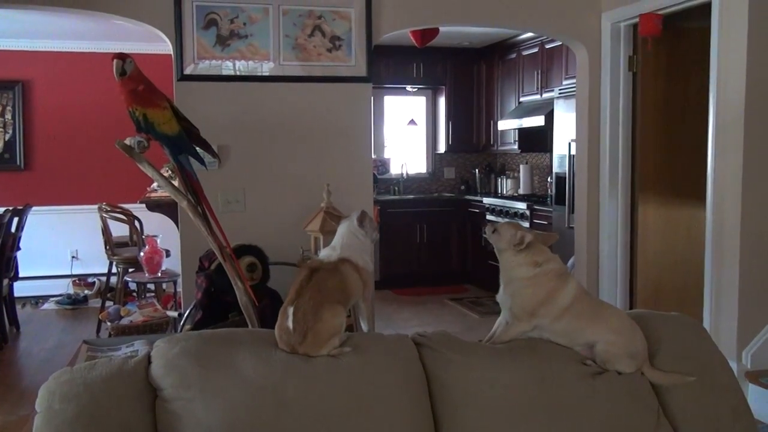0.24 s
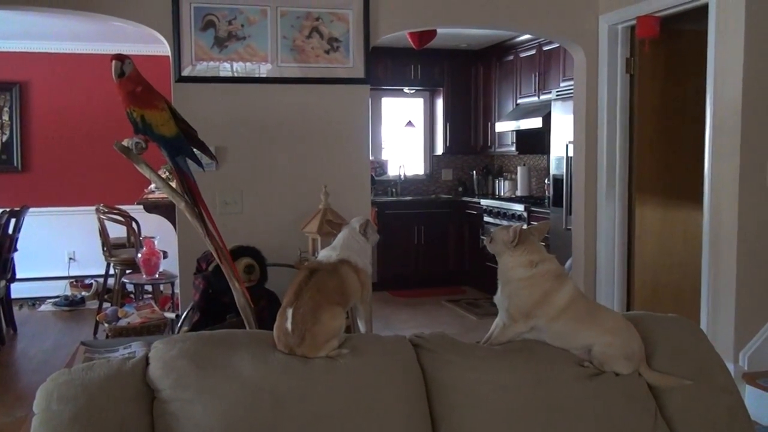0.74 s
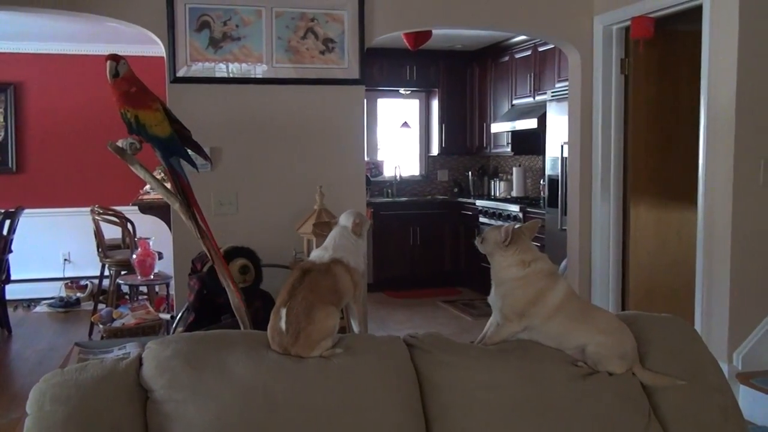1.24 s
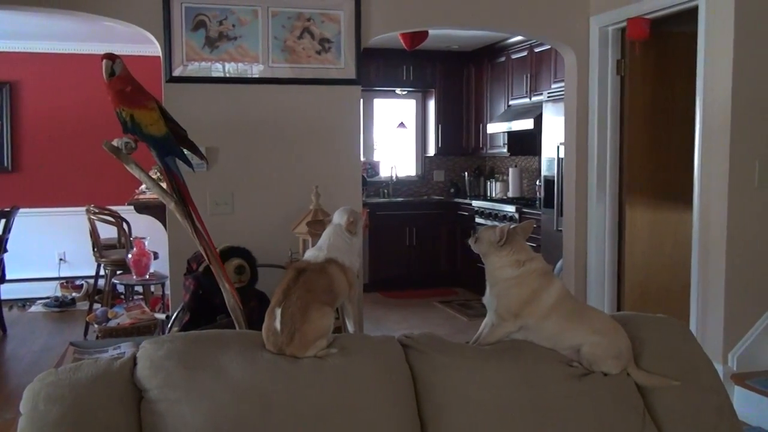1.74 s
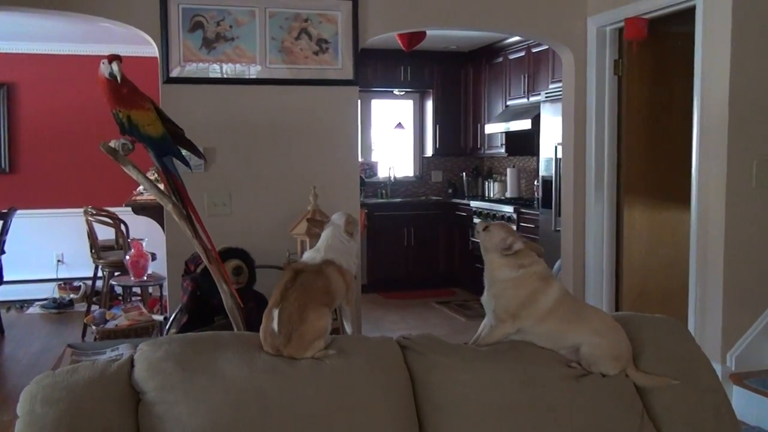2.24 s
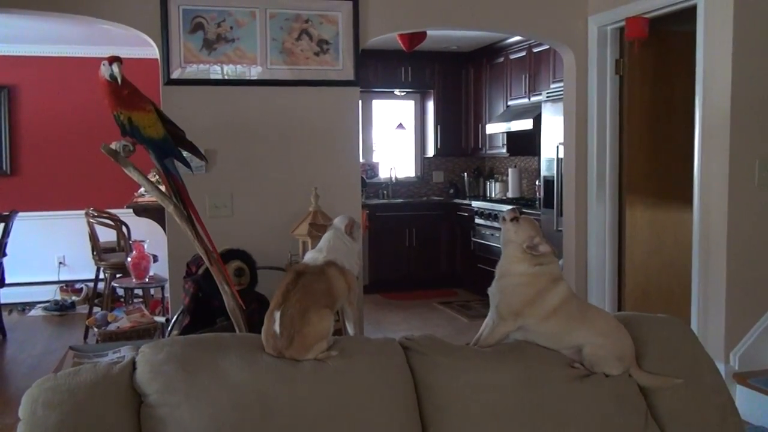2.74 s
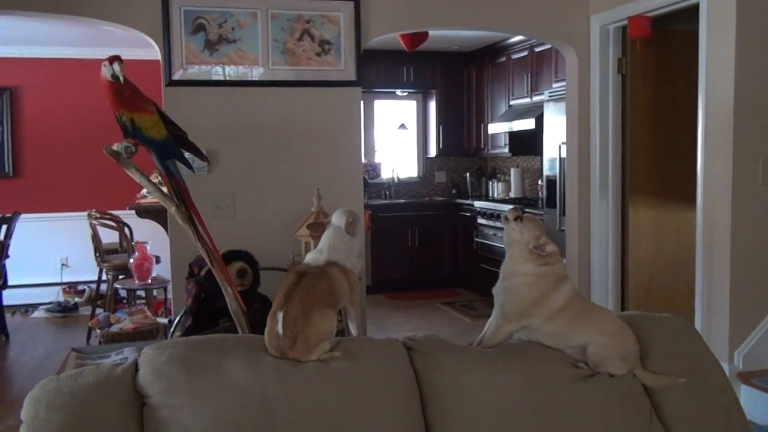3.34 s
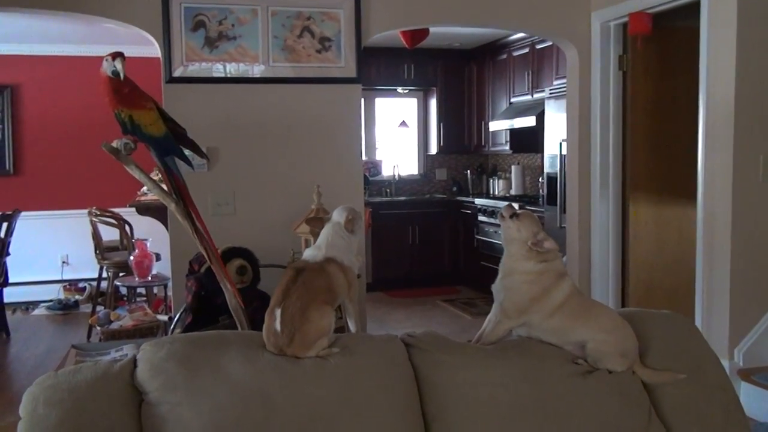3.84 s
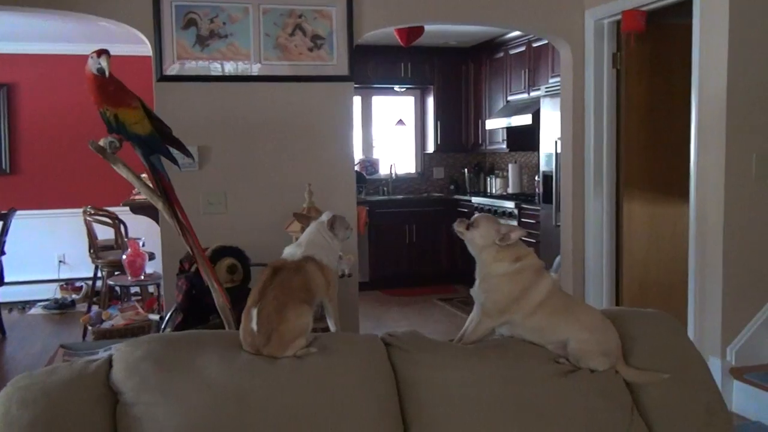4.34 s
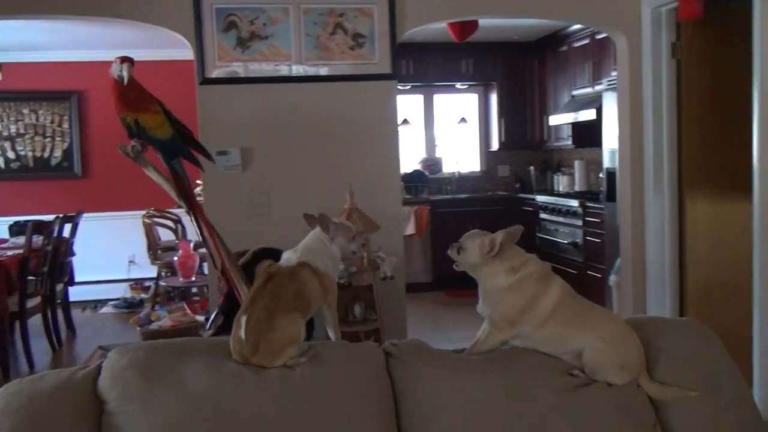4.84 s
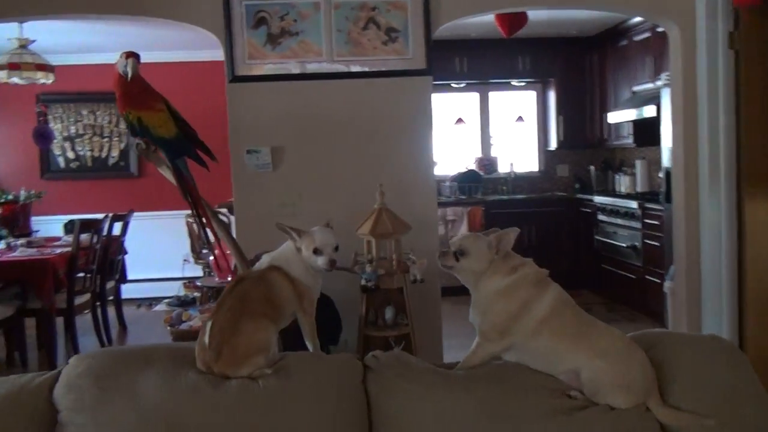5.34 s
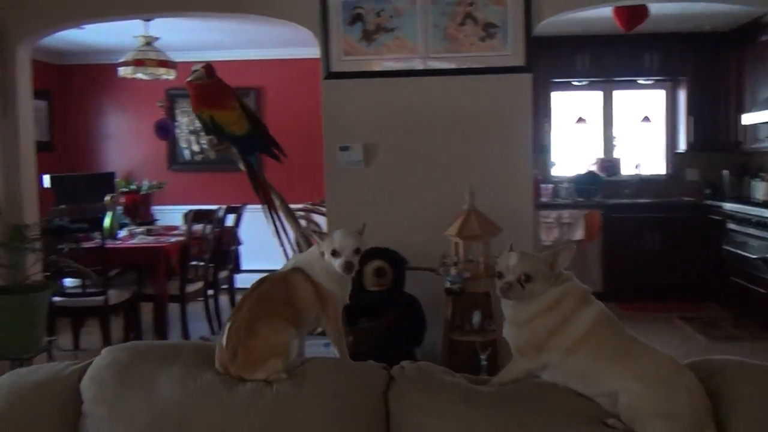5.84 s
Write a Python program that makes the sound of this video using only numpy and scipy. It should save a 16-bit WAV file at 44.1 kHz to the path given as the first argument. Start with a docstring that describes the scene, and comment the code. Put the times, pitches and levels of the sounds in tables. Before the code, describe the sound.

A small dog, slightly to the right in a living room, opens with a brief high whine over the rough tail of a bark. Very soft whimpers and thin whistles follow, growing a little just before 2 seconds. At about 2.1 seconds a sharp, raspy bark closes into a long, high howl. It swells unevenly, sinks in pitch and fades, with a brief whistling overtone near 3.2 seconds and a hoarse crack near 3.7. At 4.1 seconds a loud rising yelp ends it. Two short, sharp yips come at about 4.8 and 5.5 seconds, with quiet whimpers around them and a last faint one near 6 seconds. The room rings for about half a second after each call, and the loudest calls sound slightly held down. Quiet room tone lies underneath, with the faint whir and a few ticks of a hand-held camera in the last two seconds.

```python
"""A small dog whines over the rough fading tail of a bark, barks into a long falling howl, then gives a
yelp and two sharp yips. Soft whimpers and thin whistles come between the calls, and an overtone of the
howl flares briefly near 4 kHz. The voice is a source-filter system: vocal folds and puffs of breath
excite throat, mouth and nose. A live living room rings after each call. Behind lie room tone and the
faint whir and ticks of a hand-held camera, whose gain control holds the loudest calls down."""
import sys
import numpy as np
from scipy import signal
from scipy.fft import rfft, irfft
from scipy.io import wavfile
from scipy.ndimage import uniform_filter1d

SR = 44100
rng = np.random.default_rng(int(sys.argv[2]) if len(sys.argv) > 2 else 0)


def unload_audio(sound):
    """Save the sound as a 16-bit wav file, at the path given as the first command line argument."""
    columns = np.transpose(np.atleast_2d(sound))
    # keep every value between -1 and 1, then stretch to whole-number steps
    steps = np.round(np.clip(columns, -1, 1) * 32767)
    wavfile.write(sys.argv[1], SR, steps.astype(np.int16))


N = 268260

# Voice levels are those at the source. "Opening" is the treble lift that a wider mouth gives.
# course of the long howl: (time [s], pitch [Hz], level [dB], opening [dB/octave])
HOWL = [(2.19, 850, -47, -5), (2.24, 798, -22.5, 0), (2.33, 781, -24, -3.5), (2.42, 787, -37.5, 3),
        (2.53, 780, -32, 7), (2.61, 801, -18.5, -1), (2.68, 763, -30.5, 0), (2.76, 743, -41, 3),
        (2.81, 702, -29.5, -1), (2.865, 654, -42, 5), (3.02, 604, -37.5, 1), (3.15, 597, -38, .5),
        (3.23, 655, -36.5, 4.5), (3.315, 677, -30, 1.5), (3.4, 577, -38, 0), (3.46, 541, -33, -13),
        (3.6, 452, -48.5, -2), (3.73, 447, -46, 1), (3.86, 483, -55.5, 3), (3.96, 465, -56, 2),
        (4.07, 470, -46, 1)]
# clear cries, a whine and a yelp: (start [s], length [s], first pitch [Hz], top pitch [Hz],
# top after [s], last pitch [Hz], level [dB], attack [s], release [s], roughness [0-1],
# first opening [dB/octave], later opening [dB/octave])
CRIES = [(0, .26, 782, 796, .07, 695, -22.4, .002, .11, .02, 24, -4),
         (4.08, .19, 535, 788, .11, 740, -17, .05, .06, .09, -15, 8)]
# a bark and two yips: (start [s], length [s], first pitch [Hz], top pitch [Hz], top after [s],
# last pitch [Hz], level [dB], release [s], roughness [0-1], opening [dB/octave],
# closing [dB/octave], subharmonics [ratio], added fundamental [ratio])
BARKS = [(2.069, .21, 480, 1030, .066, 770, -17, .095, .5, 6.3, 45, 1.6, .03),
         (4.81, .175, 470, 1090, .08, 1010, -18.2, .04, .31, 5, 3, 5, .5),
         (5.496, .17, 495, 1035, .052, 885, -16, .06, .21, 7.5, 5, 2.7, .62)]
# first the rough fading tail of a bark under the start of the whine, then soft whimpers:
# (start [s], length [s], first pitch [Hz], last pitch [Hz], level [dB], roughness [0-1],
# opening [dB/octave])
SOFT_GLIDES = [(0, .09, 1180, 1290, -40, .25, -12), (.3, .09, 830, 1060, -46, .3, -10),
               (.51, .12, 412, 365, -65, .1, -20), (.65, .16, 425, 436, -64.5, .08, -22),
               (.88, .12, 757, 670, -66, .15, -10), (1.816, .04, 760, 540, -50, .38, 1),
               (1.888, .11, 850, 950, -43, .1, 4.5), (1.97, .098, 1110, 1152, -48, .02, -7),
               (2.448, .15, 700, 815, -39.5, .38, 17), (2.5, .18, 1000, 866, -39.5, .045, 2),
               (3.7, .08, 590, 640, -49, .2, -7), (3.79, .17, 685, 729, -49, .04, -6),
               (4.35, .11, 880, 1010, -53, .15, 8), (4.455, .13, 1050, 1160, -44.5, .07, -10),
               (4.58, .16, 1160, 1087, -54, .75, 3), (4.71, .07, 392, 380, -58, .1, -25),
               (5.17, .1, 405, 452, -59, .1, -20), (5.28, .18, 690, 560, -59, .3, -12),
               (5.31, .12, 680, 600, -58, .7, 45), (5.98, .09, 430, 450, -59, .2, -5)]
# throaty rasp as the bark closes into the howl: one row, columns as in SOFT_GLIDES
RASP = (2.125, .1, 920, 830, -19.5, .49, -3)
# thin whistles of the voice and, at 3.24 s, an overtone of the howl flaring briefly near 4 kHz:
# (start [s], length [s], first pitch [Hz], last pitch [Hz], level [dB])
THIN_TONES = [(.14, .13, 3740, 3620, -73), (1.38, .22, 1290, 1320, -74), (1.68, .15, 1484, 1415, -72),
              (2.44, .29, 8520, 8270, -73), (3.24, .12, 3940, 4070, -64), (4.193, .055, 3950, 3070, -50),
              (4.38, .2, 2900, 3500, -71)]

# transfer functions of the vocal tract: (frequency [Hz], gain [dB])
NARROW_MUZZLE = [(100, -44.5), (300, -34.5), (450, 1), (750, 5), (1000, -3), (1500, -12.5), (1950, -14),
                 (2500, -36.5), (3100, -37.5), (4000, -40), (4600, -50), (5500, -53.5), (6800, -48),
                 (7400, -63), (13500, -67.5), (16000, -80.5)]  # head raised, in howl and soft glides
SHUT_MOUTH = [(100, -43.5), (400, -29.5), (780, 4.5), (1250, -9), (1580, -12.5), (2300, -38), (3150, -40),
              (3950, -51), (4700, -53.5), (5500, -48.5), (6500, -56), (9500, -62), (13300, -59.5),
              (16000, -75.5)]  # almost shut, in the whine
PARTED_LIPS = [(100, -37), (300, -17), (520, -7.5), (760, 4), (1100, -12.5), (1560, -14), (2300, -26.5),
               (2900, -43), (3900, -36.5), (4700, -56), (5450, -43.5), (7500, -65.5), (11500, -60),
               (13800, -51), (16000, -67)]  # in the yelp
BARK_JAWS = [(100, -38.5), (280, -39), (400, -16.5), (500, -16.5), (700, -10), (1000, 3), (1400, -13.5),
             (1720, -14), (2400, -15.5), (3300, -27.5), (5300, -40.5), (7000, -53.5), (8400, -52.5),
             (10000, -66), (13800, -53.5), (16000, -76)]  # wide open, as in the two yips
FIRST_YIP_JAWS = [(59, -72), (100, -64), (424, -24.5), (547, -18.5), (691, -25), (768, -7.5), (1100, 2.5),
                  (1450, -11), (1580, -16), (1680, -8.5), (4870, -23.5), (5650, -41), (6560, -32),
                  (11900, -52.5), (16000, -64)]
SECOND_YIP_JAWS = [(100, -35), (320, -25), (430, -17), (700, -22), (990, 2), (1400, -11.5), (1800, -16),
                   (2230, -11.5), (2700, -14), (3200, -18), (3700, -25.5), (5300, -36), (6400, -50.5),
                   (7900, -39.5), (10500, -57.5), (13700, -51.5), (16000, -85)]
CLOSING_JAWS = [(300, -49.5), (1100, -23.5), (1400, -6.5), (1750, 2.5), (2350, -9.5), (3000, -29),
                (6000, -42), (16000, -78.5)]  # in the rasp
# narrow peaks and dips of nose and palate: (frequency [Hz], width [Hz], gain [dB])
NOSE_PEAKS = [(4210, 88, 2.5), (4564, 250, -2), (5400, 260, 5.5), (8380, 380, 5), (9760, 230, -3),
              (13990, 700, 4.5)]

# early reflections from ceiling and walls: (delay [ms], level relative to the direct sound [dB])
ECHOES = [(3.1, -6), (5.7, -9.5), (8.3, -7.5), (11.9, 0), (15.2, -16.5), (21.4, -29)]
# reverberation time of the room: (frequency [Hz], T60 [s])
ROOM_T60 = [(150, .5), (500, 0.42), (1000, 0.52), (2500, 0.47), (5000, 0.37), (8000, 0.3), (14000, 0.15)]
# spectrum of the room tone: (frequency [Hz], relative density [dB])
ROOM_TONE_SPECTRUM = [(30, -22), (80, -18.5), (130, -7.5), (200, -5.5), (400, -4.5), (800, -5.5),
                      (1350, -1.5), (2300, -10.5), (4000, -12.5), (5500, -14.5), (9000, -17),
                      (11000, -15.5), (14000, -16.5), (16000, -22.5)]
# spectrum of the camera's whir and ticks: (frequency [Hz], relative density [dB])
WHIR_SPECTRUM = [(300, -30), (2500, -9.5), (4200, 1.5), (5500, -6), (7300, -1), (9500, -15), (11500, -7),
                 (13700, -3.5), (15000, -14)]
# swells of the whir: (peak time [s], rise [s], fall [s], level [dB])
WHIR_SWELLS = [(4.7, .5, .22, -66.5), (5.4, .06, .15, -70), (5.83, .22, .14, -65.5)]
# ticks of the camera in the hand: (time [s], level [dB], decay time [s])
TICKS = [(3.722, -68, 0.0043), (4.738, -56, 0.0053), (5.303, -53, 0.0016), (6.021, -56.5, 0.017),
         (6.03, -69, 0.0024)]

BAND_LIMIT_HZ = 16200
LIFT_BAND_HZ = (700, 3200)  # usual span over which the opening tilts the spectrum


def dog():
    """Superposition of all the calls; one random tremor perturbs the pitch of each."""
    tremor, out = wobble(rate_hz=140), np.zeros(N)
    clear = dict(jitter=.08, subharmonics=.1, breath=.9, low_cut_db=-32)
    for row, tract, lift_hz in zip(CRIES, [SHUT_MOUTH, PARTED_LIPS], [(780, 1600), LIFT_BAND_HZ]):
        add(out, *voice(cry(*row), tract, tremor, lift_hz, **clear))
    add(out, *voice(howl(), NARROW_MUZZLE, tremor, LIFT_BAND_HZ, **clear))
    jaws = [(BARK_JAWS, (2200, 12000)), (FIRST_YIP_JAWS, LIFT_BAND_HZ), (SECOND_YIP_JAWS, LIFT_BAND_HZ)]
    for (*row, subharmonics, fundamental), (tract, lift_hz) in zip(BARKS, jaws):
        add(out, *voice(bark(*row), tract, tremor, lift_hz,
                        jitter=.118, subharmonics=subharmonics, breath=1, fundamental=fundamental))
    add(out, *voice(glide(*RASP), CLOSING_JAWS, tremor, lift_hz=(1400, 3200),
                    jitter=.1, subharmonics=.72, breath=.43))
    for row in SOFT_GLIDES:
        add(out, *voice(glide(*row), NARROW_MUZZLE, tremor, lift_hz=(560, 2400),
                        jitter=.13, subharmonics=.2, breath=.45, low_cut_db=-40))
    for row in THIN_TONES:
        add(out, *thin_tone(glide(*row), tremor))
    return out


def voice(controls, tract, tremor, lift_hz, jitter, subharmonics, breath, fundamental=0, low_cut_db=0):
    """Source-filter model: the larynx excites the vocal tract. Returns start time and sound."""
    times, *columns = np.transpose(controls)
    at = np.arange(max(round(times[0] * SR), 0), min(round(times[-1] * SR), N))
    pitch, level_db, rough, opening = (np.interp(at / SR, times, c) for c in columns)
    rough = np.clip(rough, 0, .95)
    cycles = np.cumsum(pitch * (1 + jitter * rough * tremor[at])) / SR
    source = larynx(cycles, pitch, rough, subharmonics, breath)
    sound = vocal_tract(source, tract, pitch, opening, lift_hz, low_cut_db)
    sound /= np.sqrt(abs(uniform_filter1d(sound ** 2, size=700)) + 1e-20)  # running rms of 1
    # the jaw keeps the first resonance on the pitch, so the fundamental stays strong through a glide
    sound = (sound + fundamental * np.sqrt(2) * np.cos(2 * np.pi * cycles)) / (1 + .3 * fundamental)
    edge_fade = np.minimum(1, np.minimum(at - at[0], at[-1] - at) / (.002 * SR))
    return times[0], sound * gain_of(level_db) * edge_fade


def larynx(cycles, pitch, rough, subharmonics, breath):
    """Glottal excitation: a harmonic pulse train, traded for puffs of turbulence as roughness grows."""
    folds = sum(np.cos(2 * np.pi * k * cycles) * (k * pitch < BAND_LIMIT_HZ) for k in range(1, 30))
    # period doubling: strained folds alternate strong and weak cycles
    folds = unit_rms(folds) * (1 + subharmonics * rough * np.cos(np.pi * cycles))
    airflow = .19 + np.exp(-(cycles % 1) / .38)
    puffs = unit_rms(airflow * rng.standard_normal(len(cycles)))
    return (1 - rough) * folds + breath * rough * puffs


def vocal_tract(source, tract, pitch, opening, lift_hz, low_cut_db):
    """Resonance: throat, mouth and nose shape the spectrum; a wider mouth radiates more treble."""
    t = np.arange(len(source)) / SR
    hz, frame_s, spectra = signal.stft(source, SR, nperseg=512, noverlap=384)
    nose_db = sum(db * np.exp(-((hz - centre) / width) ** 2) for centre, width, db in NOSE_PEAKS)
    colour_db = curve_at(tract, hz) + nose_db
    octaves_up = np.log2(np.clip(hz, *lift_hz) / lift_hz[0])[:, None]
    lift_db = octaves_up * np.interp(frame_s, t, opening)
    # under the fundamental the spectrum falls off by low_cut_db per octave
    corner_hz = .8 * np.interp(frame_s, t, pitch)
    octaves_under = np.log2(np.maximum(corner_hz / (hz[:, None] + 1), 1))
    spectra *= gain_of(colour_db[:, None] + lift_db + low_cut_db * octaves_under)
    return signal.istft(spectra, SR, nperseg=512, noverlap=384)[1][:len(source)]


def howl(waver=.0025, crack_at_s=3.74, crack_width_s=.115):
    """Controls of sustained phonation: clear, but for a crack where the pitch is lowest."""
    times, *columns = np.transpose(HOWL)
    t = np.linspace(times[0], times[-1], 1000)
    pitch, level, opening = (np.interp(t, times, c) for c in columns)
    pitch *= 1 + waver * wobble(rate_hz=14)[(t * SR).astype(int)]
    rough = .048 + .55 * np.exp(-((t - crack_at_s) / crack_width_s) ** 2)
    return np.column_stack([t, pitch, level, rough, opening])


def bark(start, length, first_hz, top_hz, top_s, last_hz, level_db, release_s, rough, opening, closing):
    """Controls of a hard glottal onset: the jaws start wide and close as the pitch sinks."""
    t, pitch, level, rough, sink = air_push(
        start, length, first_hz, top_hz, top_s, last_hz, level_db, release_s, rough,
        attack_s=.019, sag_db_per_s=12, onset_rough=.4)
    return np.column_stack([t, pitch, level, rough, opening - closing * sink])


def cry(start, length, first_hz, top_hz, top_s, last_hz, level_db, attack_s, release_s, rough,
        first_opening, later_opening, mouth_s=.034, closing=10):
    """Controls of nearly periodic phonation: the mouth settles, then narrows as the pitch sinks."""
    t, pitch, level, rough, sink = air_push(
        start, length, first_hz, top_hz, top_s, last_hz, level_db, release_s, rough,
        attack_s, sag_db_per_s=15, onset_rough=.08)
    opening = later_opening + (first_opening - later_opening) * np.exp((start - t) / mouth_s)
    return np.column_stack([t, pitch, level, rough, opening - closing * sink])


def air_push(start, length, first_hz, top_hz, top_s, last_hz, level_db, release_s, rough,
             attack_s, sag_db_per_s, onset_rough, onset_db=-16, release_db=-25, settle_s=.012):
    """Transient of one push of air: the pitch leaps and sinks (0-1); the folds start rough and settle."""
    t = np.linspace(0, length, 200)
    rise = np.sin(np.pi / 2 * np.minimum(t / top_s, 1))
    sink = np.maximum(t - top_s, 0) / (length - top_s)
    pitch = first_hz + (top_hz - first_hz) * rise + (last_hz - top_hz) * sink
    onset = np.maximum(1 - t / attack_s, 0)
    release = np.clip(1 - (length - t) / release_s, 0, 1)
    level = level_db + onset_db * onset - sag_db_per_s * t + release_db * release
    return start + t, pitch, level, rough + onset_rough * np.exp(-t / settle_s), sink


def glide(start, length, first_hz, last_hz, level_db, *steady, attack_s=.018, onset_db=-16, fade_db=-10):
    """Controls of a frequency glide: the pitch eases to its goal as the level swells and fades."""
    progress = np.linspace(0, 1, 100)
    pitch = last_hz + (first_hz - last_hz) * (1 - progress) ** 1.7
    onset = np.maximum(1 - progress * length / attack_s, 0)
    level = level_db + onset_db * onset + fade_db * progress ** 2
    return np.column_stack(np.broadcast_arrays(start + progress * length, pitch, level, *steady))


def thin_tone(controls, tremor, waver=.0018):
    """A single wavering sinusoid: a whistle of the tight larynx, or the howl's flaring overtone."""
    times, hz, db = np.transpose(controls)
    at = np.arange(round(times[0] * SR), round(times[-1] * SR))
    cycles = np.cumsum(np.interp(at / SR, times, hz) * (1 + waver * tremor[at])) / SR
    envelope = gain_of(np.interp(at / SR, times, db)) * signal.windows.tukey(len(at), .2)
    return times[0], envelope * np.sqrt(2) * np.sin(2 * np.pi * cycles)


def room(sound, wet_db, side_db, mode_hz=396, mode_db=-54.5, mode_t60_s=.25):
    """Convolution with direct sound, echoes, reverberation and a standing wave between two walls."""
    t = np.arange(SR) / SR
    mid = gain_of(wet_db) * reverberation(build_s=.019)
    mid += gain_of(mode_db - 60 * t / mode_t60_s) * np.cos(2 * np.pi * mode_hz * t)
    mid[0] += 1  # direct sound
    for delay_ms, db in ECHOES:
        add(mid, delay_ms / 1000, gain_of([db]))
    mid /= np.linalg.norm(mid)
    side = gain_of(side_db) * reverberation(build_s=.0048)  # weak: two close microphones hear alike
    return signal.fftconvolve(sound[None], np.array([mid + side, mid - side]), axes=1)[:, :N]


def reverberation(build_s):
    """Diffuse field: dense reflections of random sign, each band decaying at its own exponential rate."""
    reflections = rng.choice([-1., 1.], SR) * (rng.random(SR) < .1)
    hz, t, spectra = signal.stft(reflections, SR, nperseg=256)
    decay = gain_of(-60 * t / curve_at(ROOM_T60, hz)[:, None])
    build_up = 1 - np.exp(-t / build_s)
    ring = signal.istft(spectra * decay * build_up, SR, nperseg=256)[1][:SR]
    return ring / np.linalg.norm(ring)


def camera(idle_db=-89):
    """Amplitude-modulated noise: the whir swells and flutters, and handling ticks decay exponentially."""
    t = np.arange(N) / SR
    swells = sum(gain_of(db) * np.exp(-((t - peak) / np.where(t < peak, rise, fall)) ** 2)
                 for peak, rise, fall, db in WHIR_SWELLS)
    whir = (gain_of(idle_db) + swells) * gain_of(1.2 * wobble(rate_hz=25))
    ticks = sum(gain_of(db) * (t >= start) * np.exp(-abs(t - start) / decay)
                for start, db, decay in TICKS)
    return (whir + ticks) * coloured_noise(WHIR_SPECTRUM)


def room_tone(level_db=-72):
    """Stationary noise, largely correlated between the two channels."""
    mid, side = coloured_noise(ROOM_TONE_SPECTRUM), coloured_noise(ROOM_TONE_SPECTRUM)
    return gain_of(level_db) * (mid + np.array([[.22], [-.22]]) * side)


def coloured_noise(spectrum):
    """Spectral shaping of white noise, at rms 1."""
    gain = gain_of(curve_at(spectrum, np.fft.rfftfreq(N, 1 / SR)))
    return unit_rms(irfft(rfft(rng.standard_normal(N)) * gain, N))


def wobble(rate_hz):
    """Low-pass filtered noise: a random drift of rms 1, mostly slower than the rate."""
    hz = np.fft.rfftfreq(N, 1 / SR)
    return unit_rms(irfft(rfft(rng.standard_normal(N)) / (1 + (hz / rate_hz) ** 2), N))


def curve_at(points, hz):
    """Interpolation on a logarithmic frequency axis."""
    point_hz, values = np.transpose(points)
    return np.interp(np.log(hz + 1), np.log(point_hz + 1), values)


def gain_of(db):
    """Decibels to amplitude ratio."""
    return 10 ** (np.asarray(db) / 20)


def unit_rms(x):
    """Normalisation to rms 1."""
    return x / np.sqrt(np.mean(x ** 2) + 1e-20)


def add(mix, start_s, sound):
    """Superposition of a sound on the mix."""
    part = mix[max(round(start_s * SR), 0):][:len(sound)]
    part += sound[:len(part)]


def scene():
    """Level panning sets the dog a little to the right, over room tone and camera noise."""
    dog_in_room = room(dog(), wet_db=-3, side_db=-15.5) * gain_of([[-.4], [.4]])
    return dog_in_room + room_tone() + camera()


def record(dry, threshold_db=-19, squeeze=.51, recovery_db_per_s=45, makeup_db=1.5, ceiling=.42):
    """Compression: gain control holds loud calls down, a soft knee rounds peaks, a low-pass follows."""
    power_db = 10 * np.log10(abs(uniform_filter1d((dry ** 2).mean(0), size=400)) + 1e-12)
    recovery_db = np.arange(N) * recovery_db_per_s / SR
    peak_db = np.maximum.accumulate(power_db + recovery_db) - recovery_db  # jumps up, falls slowly
    over_db = np.maximum(peak_db - threshold_db, 0)
    held = dry * gain_of(makeup_db - squeeze * uniform_filter1d(over_db, size=200))
    rounded = held / (1 + (held / ceiling) ** 8) ** (1 / 8)
    low_pass = signal.firwin(511, BAND_LIMIT_HZ, window=("kaiser", 9), fs=SR)
    return signal.oaconvolve(rounded, low_pass[None], "same")


dry = scene()
out = record(dry)
unload_audio(out)
```